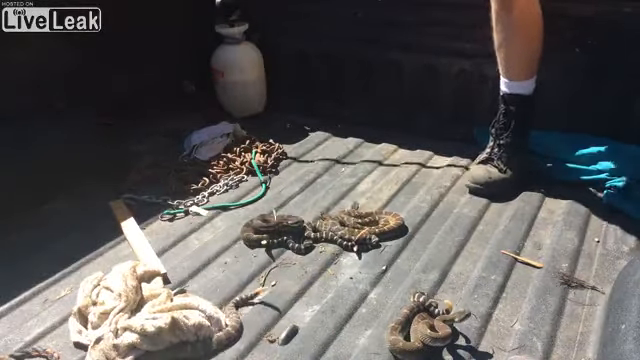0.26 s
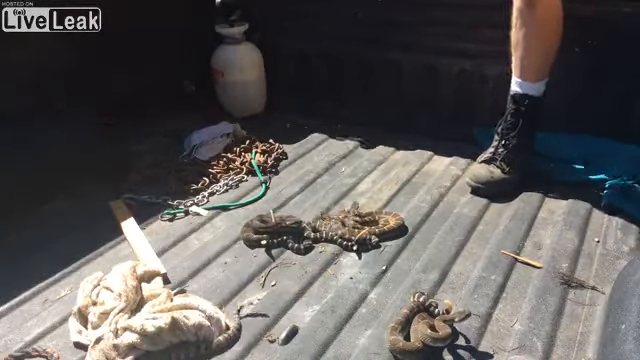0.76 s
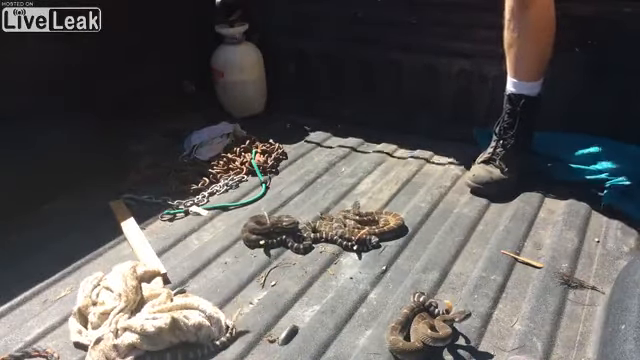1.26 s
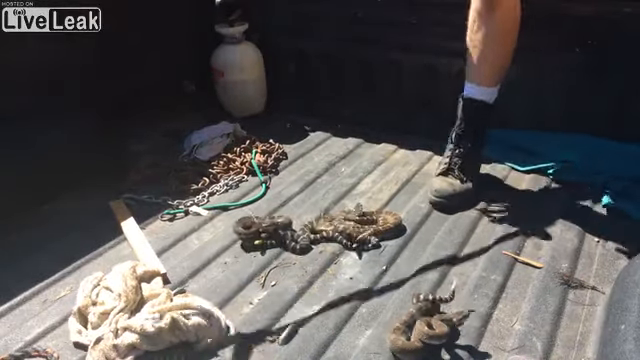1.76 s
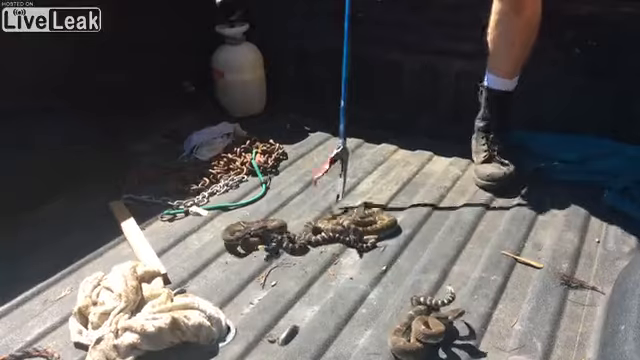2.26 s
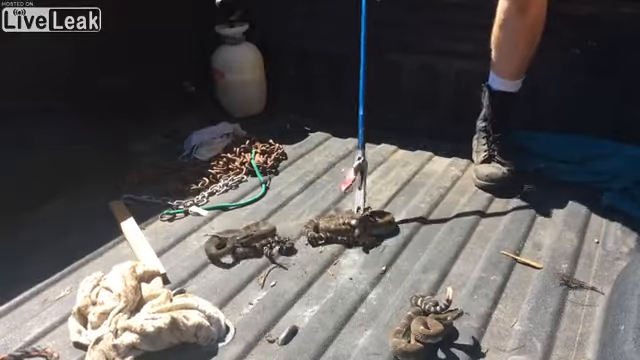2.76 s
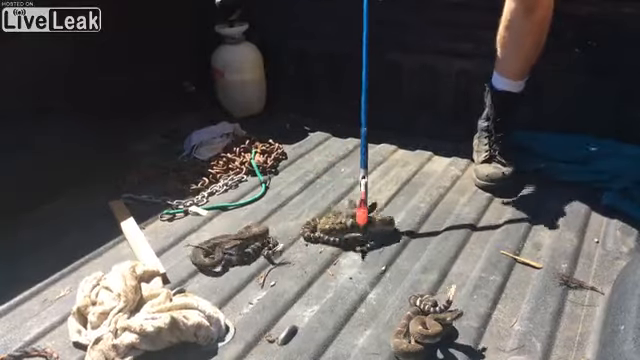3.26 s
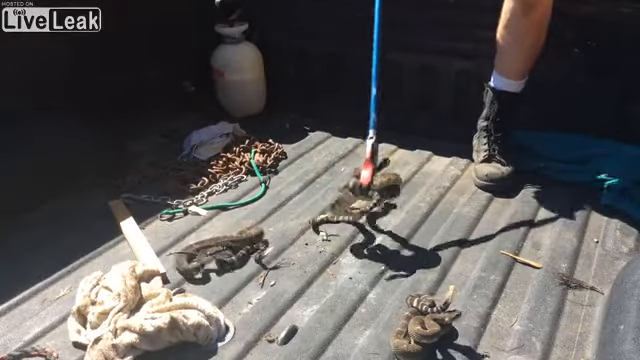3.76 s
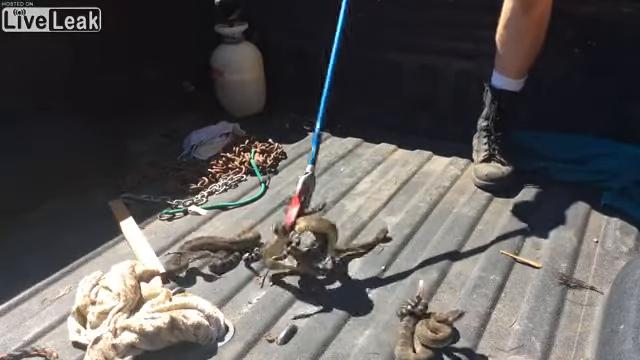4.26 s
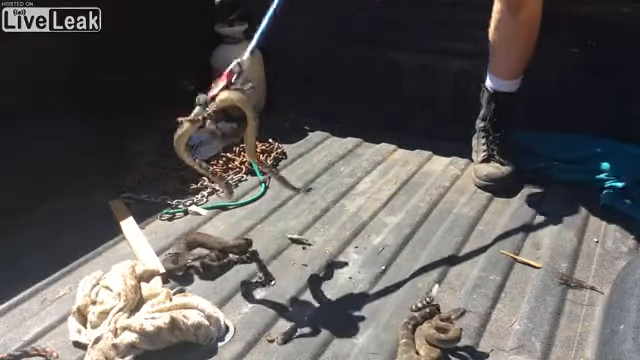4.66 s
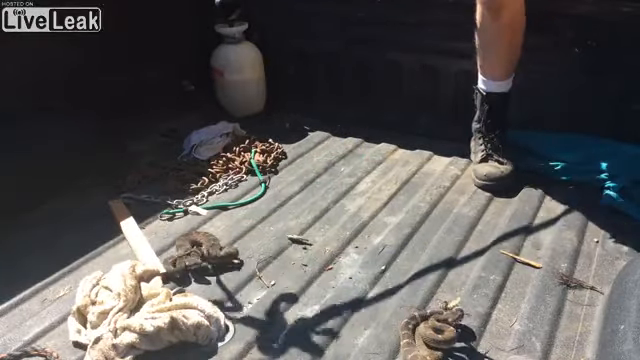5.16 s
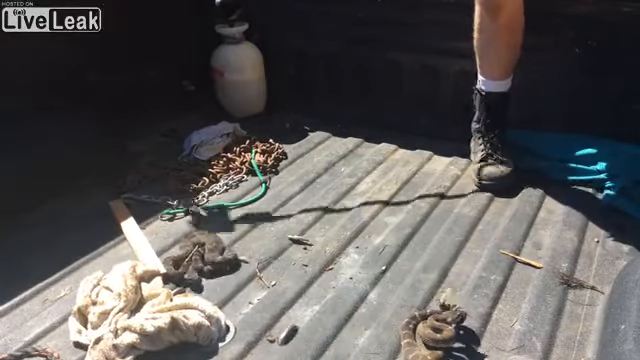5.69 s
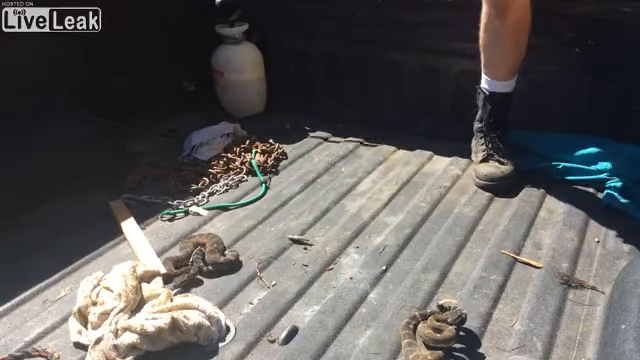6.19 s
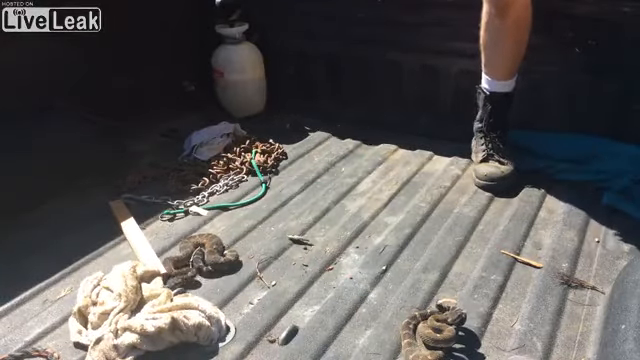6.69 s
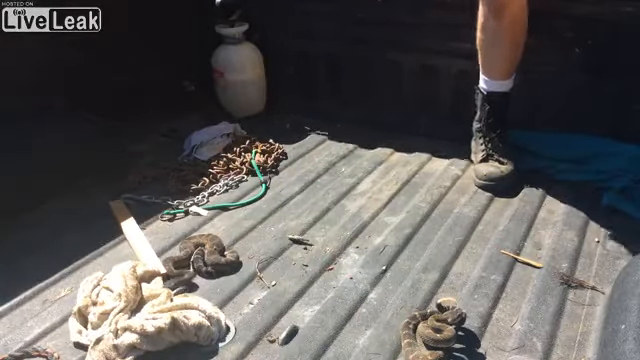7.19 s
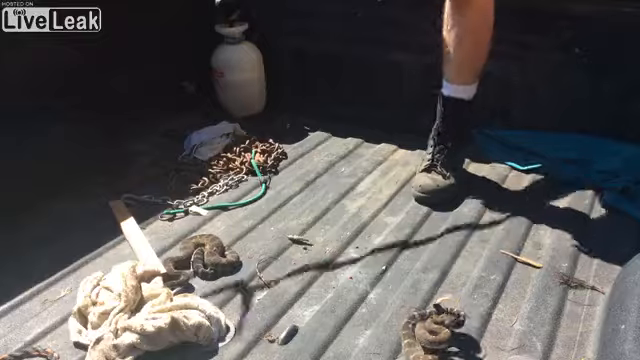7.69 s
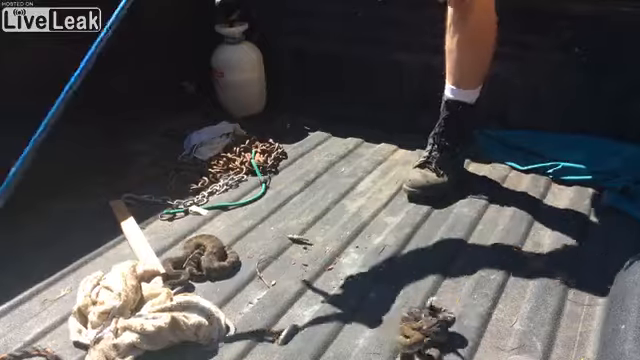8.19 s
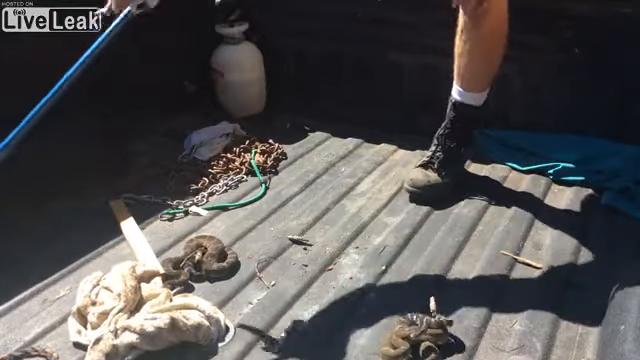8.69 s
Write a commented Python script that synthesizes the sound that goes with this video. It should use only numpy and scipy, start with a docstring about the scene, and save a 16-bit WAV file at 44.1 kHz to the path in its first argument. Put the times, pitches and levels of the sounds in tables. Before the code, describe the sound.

Over a faint outdoor rumble, boots thump a steel truck bed, tongs clink sharply, and a rattlesnake buzzes in short bursts and longer runs.

```python
"""Rattlesnakes on the ribbed steel bed of a truck, in the open air, over a low outdoor rumble of shaped noise.
Grit rustles (tiny pitched clicks), boots thud and shift (blows and slips on plate modes), a tail shakes
(bunched clicks of horn segments), and tongs clink (cracks of noise with ringing metal). More short shakes
lead to a long buzz, fading into weak shakes and faint rustles. Tongs clink again, a boot thuds, shakes
return, and a second long buzz comes with a last faint clink and last thuds."""
import sys
import numpy as np
from scipy import signal
from scipy.fft import rfft, irfft, next_fast_len
from scipy.io import wavfile

SR = 44100
rng = np.random.default_rng(int(sys.argv[2]) if len(sys.argv) > 2 else 0)


def persist_wave(psi):
    """Save psi, clipped to +-1, as 16-bit WAV."""
    counts = np.round(np.clip(psi, -1, 1) * 32767).astype(np.int16)
    wavfile.write(sys.argv[1], SR, np.atleast_2d(counts).T)


N = 394254

# Short tail shakes. Each row: start in seconds, hold in seconds, level in dB, rise in ms per 20 dB.
TAIL_SHAKES = [(1.575, 0.071, -33, 18), (1.727, 0.05, -33, 11), (1.835, 0.058, -35, 18),
               (1.971, 0.043, -35, 20), (2.247, 0.037, -36, 18), (2.471, 0.028, -34, 9),
               (3.295, 0.028, -35, 21), (3.766, 0.036, -35.5, 14), (3.889, 0.028, -34, 11),
               (4.002, .05, -34.5, 23), (5.409, 0.031, -38, 33), (5.508, 0.032, -40, 26),
               (5.626, .025, -37.5, 18), (5.753, 0.027, -39, 22), (5.886, 0.039, -40.5, 8),
               (7.814, 0.045, -34.5, 7), (7.936, 0.031, -34, 19), (8.048, .045, -33.5, 7),
               (8.599, 0.044, -38.5, 28), (8.709, 0.027, -33.5, 14)]
# Long buzzes, one list each, from full voice to the moment the tail stops.
# Each row: time in seconds, effort in dB.
LONG_BUZZES = [
    [(4.068, -32.5), (4.25, -30.5), (4.59, -31.5), (5.12, -36.5), (5.29, -34)],
    [(8.254, -35.5), (8.3, -30), (8.484, -33)],
]
# Tail speed. Each row: time in seconds, strokes per second.
TAIL_SPEED = [(0, 143), (4.1, 82), (4.4, 113), (4.94, 118), (5.2, 108), (5.4, 92), (8.2, 119), (8.94, 130)]
# Spectrum of the rattle. Each row: frequency in Hz, relative density in dB per Hz.
RATTLE_SPECTRUM = [(880, -19), (1500, -20.5), (2420, -20), (3610, -9.5), (3830, -10.5), (4060, -8),
                   (5040, -7.5), (5950, -1.5), (7300, -5.5), (9330, -2), (11100, -4.5), (12900, -5),
                   (14800, -2.5), (15500, -0.5)]
BUZZ_RISE_MS, TAIL_FALL_MS = 12.0, 44.4   # per 20 dB

# Boot thuds. Each row: time in seconds, relative blow level in dB, Hz of the panel hit, brightness in dB.
BOOT_THUDS = [(0.95, -39, 149, -3), (1.048, -50, 170, -3), (1.082, -25, 102, -15.5), (1.323, -30, 101, -26),
              (1.698, -18, 245, -17.5), (2.178, -38, 204, -18), (2.32, -20, 310, -10.5),
              (2.4042, -17, 176, -7.5), (2.427, -23, 200, -12), (2.984, -32.5, 165, -21),
              (3.01, -26, 90, -43), (7.517, -39, 96, -9), (7.628, -15.5, 199, -15), (8.791, -31.5, 82, -14),
              (8.878, -42, 89, -39)]
# Modes of the steel bed. Each row: frequency in Hz, relative level in dB, free t60 in seconds.
BED_MODES = [(61.5, 3.5, 0.063), (97.1, 1.5, 0.15), (156, 1.5, 0.2), (197, 0, 0.11), (262, 0.5, 0.083),
             (306.3, -1.5, 0.11), (350.5, 0, 0.073), (408.5, -9, 0.2), (466.5, 0, 0.038),
             (568, -2.5, 0.059), (609, 1.5, 0.033), (741, -1, 0.063), (817, 8, 0.013), (991, -4, 0.024),
             (1202, 0.5, 0.013), (1353, -12.5, 0.12)]
# Upper edges in Hz of the boom, drum and knock ranges of modes; the rasp range lies above them.
MODE_RANGE_EDGES_HZ = (125, 220, 440)
# A sole shifts its weight on the steel. Each row: start in seconds, hold in seconds, then the levels
# in dB of the modes in the boom, drum, knock and rasp ranges.
WEIGHT_SHIFTS = [(0.95, 0.1, -55, -39.5, -48.5, -50), (1.073, 0.02, -36.5, -45, -44.5, -59),
                 (1.323, 0.019, -52, -59, -49, -50), (1.528, 0.011, -64, -68, -61, -56.5),
                 (1.698, 0.023, -36.5, -36, -43, -42.5), (2.319, 0.012, -36, -37, -31, -36),
                 (2.405, 0.01, -40, -32, -33, -29), (2.99, 0.18, -40, -43, -48.5, -55.5),
                 (3.168, 0.064, -55, -47.5, -52, -54), (7.488, 0.07, -38.5, -50, -61, -63),
                 (7.518, 0.033, -54, -52, -48.5, -44), (7.628, 0.0067, -36, -33.5, -39.5, -44.5),
                 (7.86, 0.14, -60, -55, -66.5, -75), (8.05, 0.033, -53.5, -75, -64, -56),
                 (8.788, 0.014, -39, -59, -59, -45.5), (8.882, .06, -49, -56, -60, -66)]
# Fall of a weight shift in ms, range by range; the first 20 dB take this long.
WEIGHT_FALL_MS = (241, 216, 139, 102)
WEIGHT_RISE_MS = 5.0   # for the first 20 dB
WEIGHT_ROUNDING = 0.92   # under 1: a quick first drop, then a lingering tail
SOLE_CUT_HZ = 800   # a rubber sole rubs dull
# The lowest modes of the bed hum all along. Each row: time in seconds, level in dB.
BED_HUM = [(0, -74), (.85, -77), (1.4, -56.5), (2.1, -51), (2.8, -64.5), (3.7, -59), (4.6, -56), (5.3, -56),
           (5.9, -57.5), (6.5, -57), (7.0, -54), (7.4, -53.5), (7.85, -49), (8.15, -56), (8.35, -45.5),
           (8.94, -50.5)]
HUM_RASP_DB = -16   # share of the rasp range, under the hum

# Tong clinks. Each row: time in seconds, then relative levels in dB of crack, jaw ring and shaft ring.
TONG_CLINKS = [(2.406, -42, -70, -48), (2.418, -23.5, -37, -46), (2.432, -31, -62, -37),
               (2.444, -38, -62, -54), (7.161, -68, -80, -63), (7.195, -40, -58, -47),
               (7.2044, -28, -30, -30.5), (7.209, -11, -24.5, -24), (7.218, -23, -44, -25),
               (7.227, -39, -24, -30), (7.248, -51, -36, -47), (7.283, -48, -42, -38.5),
               (7.3, -40, -48, -42), (7.339, -40.5, -51, -43), (8.252, -44, -62, -36)]
# Modes of the jaw. Each row: frequency in Hz, relative level in dB, t60 in seconds.
JAW_MODES = [(8646, -11, .16), (8785, -13, .13), (8899, -11, .16), (9000, -14, .13), (9055, -8, .14),
             (9240, -14, .1), (9776, -6, .07), (10150, -4, .08), (10560, -3, .07), (11040, -10, .07),
             (12190, -14, .06), (13440, -12, .06), (14280, -12, .06), (14770, -10, .05)]
# Modes of the shaft. Each row: frequency in Hz, relative level in dB, t60 in seconds.
SHAFT_MODES = [(2100, -11, .025), (2550, -9, .03), (3300, -4, .05), (4800, -5, .04), (4915, -7, .045)]
# Modes of the hinge. Each row: frequency in Hz, relative level in dB, t60 in seconds before the grip.
HINGE_MODES = [(8690, -0.5, 0.21), (10970, 5.5, 0.03)]
# The hinge rings once. The row: time in seconds, relative level in dB, second at which the closing grip damps it.
HINGE_RING = (2.417, -25, 2.467)
# Spectrum of the crack. Each row: frequency in Hz, relative density in dB per Hz.
CRACK_SPECTRUM = [(290, -31.5), (500, -14.5), (2330, -2.5), (2930, -7.5), (3240, -1.5), (4840, -2),
                  (5280, -4), (12900, -3.5), (14600, 3.5), (15500, 7)]
PULSE_DB, PULSE_GROWTH = 15, 1.5   # the contact pulse grows faster than the crack
HISS_DB, HISS_FALL_MS = -14, 88   # relative to the crack; per 20 dB

# The clearest rustles of scales and grit. Each row: start in seconds, hold in seconds, level in dB.
CLEAR_RUSTLES = [(0.951, .01, -56), (1.04, 0.011, -60), (1.1, 0.017, -61), (1.317, 0.073, -65),
                 (1.974, 0.081, -54), (2.317, 0.033, -51), (2.406, 0.019, -41), (2.552, .013, -63),
                 (2.607, .0093, -56), (2.825, 0.1, -67), (3.115, 0.023, -56.5), (3.169, 0.048, -50.5),
                 (3.242, 0.022, -48), (3.446, 0.0085, -66), (3.595, 0.047, -57.5), (3.696, 0.016, -66),
                 (6.025, .03, -60), (6.104, 0.014, -60.5), (6.15, 0.012, -64), (6.217, 0.02, -62),
                 (6.358, 0.014, -63), (6.815, 0.01, -80), (7.516, 0.1, -53), (8.032, 0.074, -46.5),
                 (8.794, 0.016, -47), (8.878, 0.022, -55)]
# Spectrum of the rustle. Each row: frequency in Hz, relative density in dB per Hz.
RUSTLE_SPECTRUM = [(400, -29), (1000, -6), (2500, 2.5), (5000, 4), (9000, 4), (15500, 5.5)]
RUSTLE_RISE_MS, RUSTLE_FALL_MS = 12, 43   # per 20 dB
STIR_DB, STIR_SWING_DB, STIR_PER_S = -76, 5.0, 7   # fainter stirring comes and goes by chance
GRIT_PATCHY_DB = 4.0   # each size of grit is stirred by turns

# Spectrum of the open air. Each row: frequency in Hz, relative density in dB.
AIR_SPECTRUM = [(18, -90), (30, -13), (85, 1.5), (389, -18), (575, -12.5), (747, -16.5), (1200, -15),
                (1470, -17.5), (3230, -20), (6540, -30.5), (9190, -25.5), (14300, -31), (15500, -31)]
AIR_DB = -61
LOW_CUT_HZ = 40   # of the microphone
TOP_STOP_HZ = 15965   # from here up the top is 70 dB down


def rattle(per_s, bunching, second, odd_db, cycles, blur_db):
    """Periodic impact excitation: hollow horn segments click, bunched at each turn of the tail."""
    strokes_per_s = along(TAIL_SPEED) * (1 + .01 * drift(6))
    phase = 2 * np.pi * np.cumsum(strokes_per_s) / SR
    turn = np.exp(bunching * (np.cos(phase) + second * np.cos(2 * phase)))
    clicks = grains(per_s * turn / turn.mean(), spread_db=1.5)
    clicks = clicks * from_db(odd_db * np.cos(phase / 2))   # one side hits harder
    dealt = rng.integers(0, 20, N)
    # each segment rings a few cycles at its own pitch, growing louder or softer by chance
    rings = np.zeros(N)
    for k, hz in enumerate(np.geomspace(2800, 15000, 20)):
        own_clicks = clicks * (dealt == k) * from_db(3.0 * drift(8))
        rings += hz * ring(own_clicks, hz, cycles / hz)
    # the bed walls smear part of the clicks into hiss, here white noise
    blur = from_db(blur_db) * rng.standard_normal(N)
    sound = colour(rms_one(rings) + blur, RATTLE_SPECTRUM)
    effort = swells([(*row, TAIL_FALL_MS) for row in TAIL_SHAKES], rounding=0.74)
    effort += sum(held(rows, BUZZ_RISE_MS, TAIL_FALL_MS) for rows in LONG_BUZZES)
    return effort * from_db(.7 * drift(15)) * sound


def bed(thud_db, reach_db, bounce_s):
    """Modal response of a plate: blows, frictional slips and a steady stir excite the steel's modes."""
    s, blow_db, panel_hz, bright_db = np.transpose(BOOT_THUDS)
    at = (s * SR).astype(int)
    sole = signal.butter(2, SOLE_CUT_HZ, fs=SR, output="sos")
    slips = signal.sosfilt(sole, grains(500, spread_db=0.0) + 1e-18)
    struck, rubbed = np.zeros(N), np.zeros((4, N))
    for k, (hz, level_db, t60) in enumerate(BED_MODES):
        sign = (-1) ** k
        part = np.searchsorted(MODE_RANGE_EDGES_HZ, hz)
        # as the sole moves, each upper mode is rubbed harder or softer by turns
        uneven = from_db(3 * drift(5)) if part >= 2 else 1
        rubbed[part] += sign * from_db(level_db) * ring(slips * uneven, hz, t60)
        # low modes answer most near the panel hit; the upper ones follow the hardness of the sole
        answer_db = -reach_db * abs(np.log2(hz / panel_hz)) if hz < 380 else bright_db + 6
        clicks = np.zeros(N)
        clicks[at] = from_db(blow_db + thud_db + level_db + answer_db)
        clicks[at + round(bounce_s * SR)] = .6 * clicks[at] * rng.uniform(-1, 1, len(at))
        # the boot stays down and damps the plate
        struck += sign * ring(clicks, hz, min(0.8 * t60, .16))
    # the sole spreads the contact over a moment
    struck = signal.sosfilt(sole, struck)
    gains = []
    for k, fall in enumerate(WEIGHT_FALL_MS):
        rows = [(start, hold, db[k], WEIGHT_RISE_MS, fall) for start, hold, *db in WEIGHT_SHIFTS]
        gains.append(swells(rows, WEIGHT_ROUNDING))
    gains[3] += from_db(along(BED_HUM) + HUM_RASP_DB)
    # each change of load eases in over a few ms
    gains = signal.lfilter([.01], [1, -.99], gains)
    shifting = sum(gain * rms_one(part) for gain, part in zip(gains, rubbed))
    stir = rng.standard_normal(N)
    hum = np.zeros(N)
    for hz, level_db, t60 in BED_MODES[:3]:
        mode = ring(ring(stir, hz, t60), hz, t60 / 2)
        hum += from_db(level_db) * rms_one(mode)
    return struck + from_db(along(BED_HUM)) * rms_one(hum) + shifting


def tongs():
    """Impact of metal on metal: a crack with a dying hiss excites the modes of jaw and shaft."""
    rings = strike([(s, jaw) for s, crack, jaw, shaft in TONG_CLINKS], JAW_MODES)
    rings += strike([(s, shaft) for s, crack, jaw, shaft in TONG_CLINKS], SHAFT_MODES)
    s, level_db, gripped = HINGE_RING
    click = from_db(level_db) * (np.arange(N) == round(s * SR))
    ping = sum(from_db(db) * ring(click, hz, t60) for hz, db, t60 in HINGE_MODES)
    rings += ping * swells([(s, gripped - s, 0, 1, 6.0)])
    crack = swells([(s, 0, db, .6, 5.0) for s, db, *_ in TONG_CLINKS])
    hiss = swells([(s, 0, db + HISS_DB, 1.2, HISS_FALL_MS) for s, db, *_ in TONG_CLINKS])
    # the first instant of contact is one sharp pulse
    pulses = [(s, PULSE_DB + PULSE_GROWTH * db) for s, db, *_ in TONG_CLINKS]
    rings += strike(pulses, [(5000, 0, .0012)])
    return rings + (crack + hiss) * colour(rng.standard_normal(N), CRACK_SPECTRUM)


def rustle():
    """Granular friction: dense fine grains ring briefly, each size at its own pitch, in short swells."""
    effort = swells([(*row, RUSTLE_RISE_MS, RUSTLE_FALL_MS) for row in CLEAR_RUSTLES])
    effort += from_db(STIR_DB + STIR_SWING_DB * drift(STIR_PER_S))
    clicks, dealt = grains(6000, spread_db=1.5), rng.integers(0, 12, N)
    rings = np.zeros(N)
    for k, hz in enumerate(np.geomspace(900, 15000, 12)):
        own_clicks = clicks * (dealt == k) * from_db(GRIT_PATCHY_DB * drift(12))
        rings += np.sqrt(hz) * ring(own_clicks, hz, 9.0 / hz)
    return effort * colour(rings, RUSTLE_SPECTRUM)


def air():
    """Broadband noise of many distant sources: a fixed spectrum with a gently unsteady level."""
    sway_db = 1.2 * drift(3)
    return from_db(AIR_DB + sway_db) * colour(rng.standard_normal(N), AIR_SPECTRUM)


def strike(rows, modes):
    """Modal excitation by blows of (s, dB): each mode takes a chance sign and strength per blow."""
    s, blow_db = np.transpose(rows)
    at = (s * SR).astype(int)
    out = np.zeros(N)
    for hz, level_db, t60 in modes:
        strength = from_db(blow_db + level_db + rng.normal(0, 2.5, len(s)))
        clicks = np.zeros(N)
        clicks[at] = strength * rng.choice([-1, 1], len(s))
        out += ring(clicks, hz, t60)
    return out


def ring(x, hz, t60):
    """Damped resonance: a unit click rings a sinusoid of height about 1; nothing passes at 0 Hz."""
    r, w = from_db(-60 / (t60 * SR)), 2 * np.pi * hz / SR
    return signal.lfilter([.5, 0, -.5], [1, -2 * r * np.cos(w), r * r], x + 1e-18)


def grains(per_s, spread_db):
    """Random point process: clicks of either sign, their sizes spread upward in dB."""
    sizes = from_db(spread_db * np.minimum(rng.exponential(1, N), 5)) * rng.choice([-1, 1], N)
    return sizes * (rng.random(N) < per_s / SR)


def swells(rows, rounding=1):
    """Growth and decay in dB, for rows of (start s, hold s, dB, rise ms, fall ms)."""
    out = np.zeros(N)
    for start, hold, level_db, rise, fall in rows:
        first = max(0, round((start - .3) * SR))
        last = min(N, round((start + hold + fall / 250) * SR))
        near = np.arange(first, last)
        ms = 1000 * (near / SR - start)
        # distance outside the hold, in units of the rise or fall time
        past = np.maximum(-ms / max(rise, .1), (ms - 1000 * hold) / max(fall, .1))
        out[near] += from_db(level_db - 20 * np.maximum(past, 0) ** rounding)
    return out


def held(rows, rise, fall):
    """Exponential growth before a level curve and decay after it (ms per 20 dB)."""
    (start, first_db), (end, last_db) = rows[0], rows[-1]
    before, after = (start - rise / 250, first_db - 80), (end + fall / 250, last_db - 80)
    return from_db(along([before, *rows, after]))


def colour(x, spectrum):
    """Linear filtering: weight a noise-like signal by a spectrum; rms 1."""
    size = next_fast_len(N)
    hz = np.maximum(np.arange(size // 2 + 1) * SR / size, 1)
    return rms_one(irfft(rfft(x, size) * from_db(at_hz(spectrum, hz)), size)[:N])


def drift(rate):
    """Low-passed random fluctuation of rms 1; rate in Hz sets its speed."""
    r = np.exp(-80 * np.pi * rate / SR)   # one value every 40 samples
    slow = signal.lfilter([1], [1, -2 * r, r * r], rng.standard_normal(N // 40 + 2002))[2000:]
    return np.interp(np.arange(N) / 40, np.arange(len(slow)), rms_one(slow))


def along(rows, column=1):
    """Linear interpolation of a column in time; -140 outside the table's span."""
    rows = np.array(rows)
    return np.interp(np.arange(N) / SR, rows[:, 0], rows[:, column], left=-140, right=-140)


def at_hz(points, hz):
    """Interpolation of a spectrum on a log-frequency axis."""
    points = np.array(points)
    return np.interp(np.log(hz), np.log(points[:, 0]), points[:, 1])


def rms_one(x):
    """Normalisation of mean power: scale to unit rms."""
    return x / np.sqrt(np.mean(x ** 2) + 1e-20)


def from_db(db):
    """Logarithmic level law: decibels to amplitude gain."""
    return 10 ** (np.asarray(db) / 20)


def scene():
    """Superposition of all sources at one microphone."""
    tail = rattle(per_s=7000, bunching=.47, second=.75, odd_db=.8, cycles=22.0, blur_db=-4)
    steel = bed(thud_db=-3.0, reach_db=14, bounce_s=0.00615)
    return (tail + steel + tongs() + rustle() + air())[None]


def record(dry):
    """Band limiting: the deepest bass is lost, the top is cut."""
    dry = signal.sosfilt(signal.butter(2, LOW_CUT_HZ, "high", fs=SR, output="sos"), dry)
    return signal.sosfilt(signal.cheby2(14, 70, TOP_STOP_HZ, fs=SR, output="sos"), dry)


dry = scene()
out = record(dry)
persist_wave(out)
```